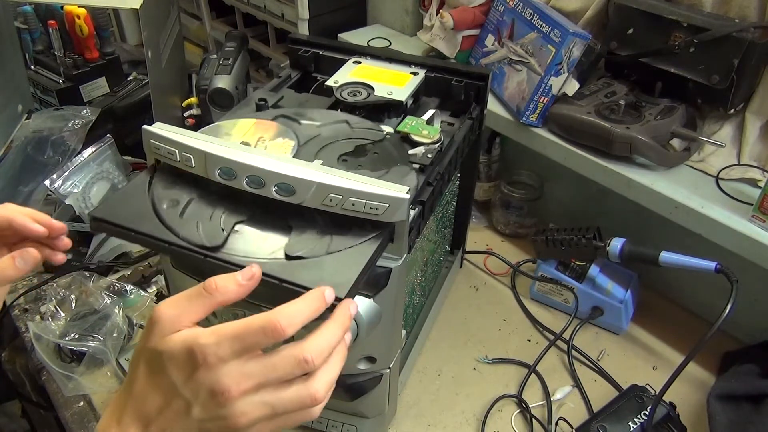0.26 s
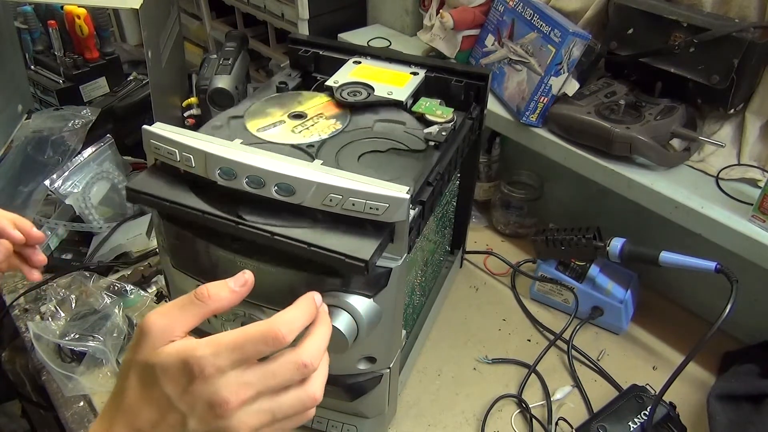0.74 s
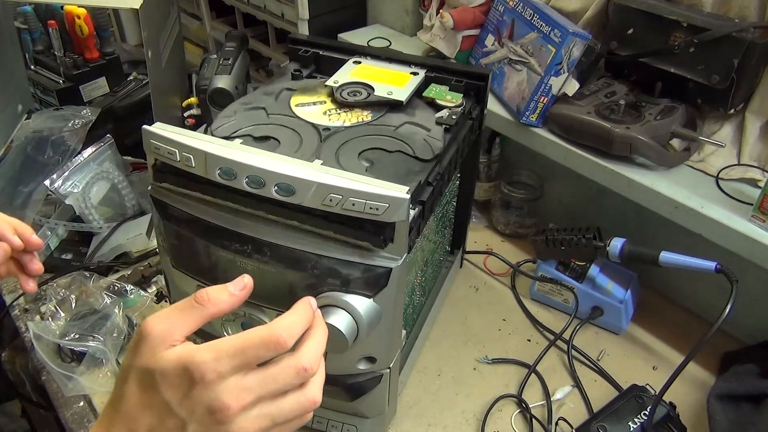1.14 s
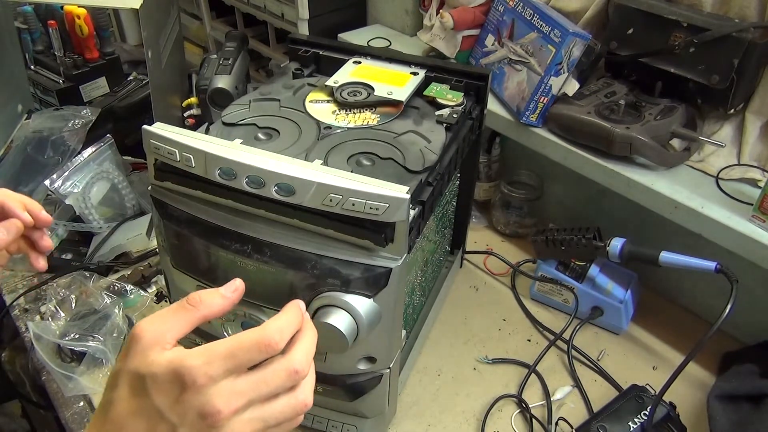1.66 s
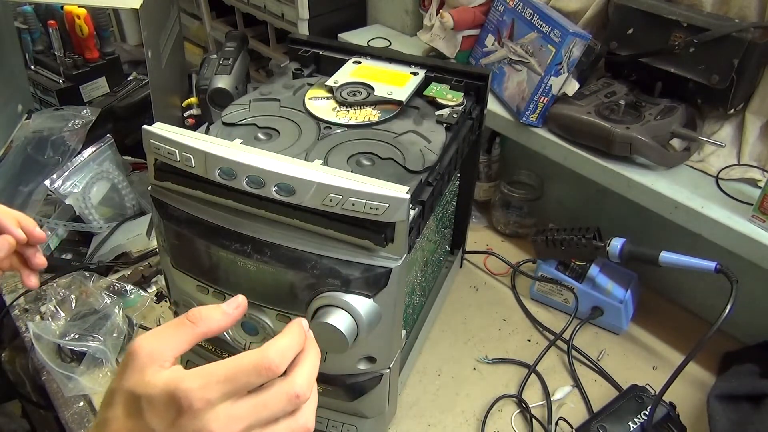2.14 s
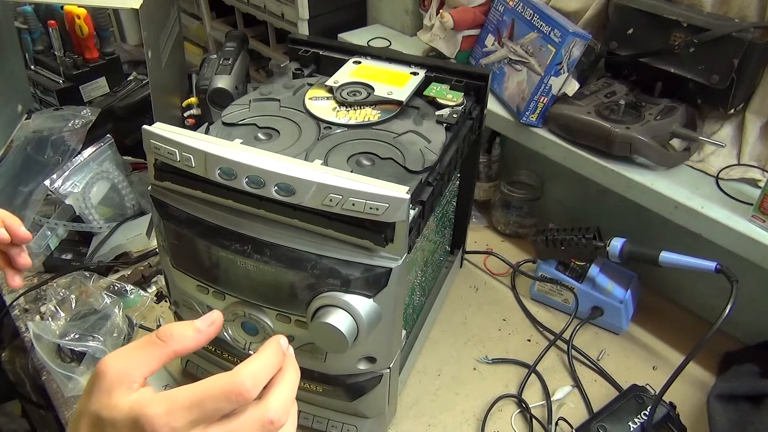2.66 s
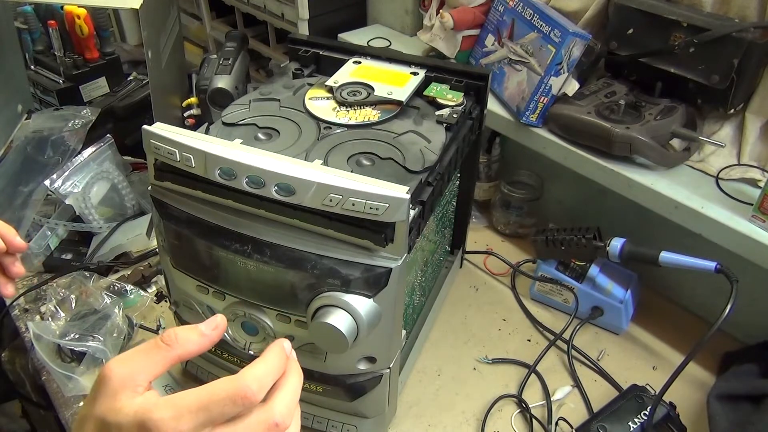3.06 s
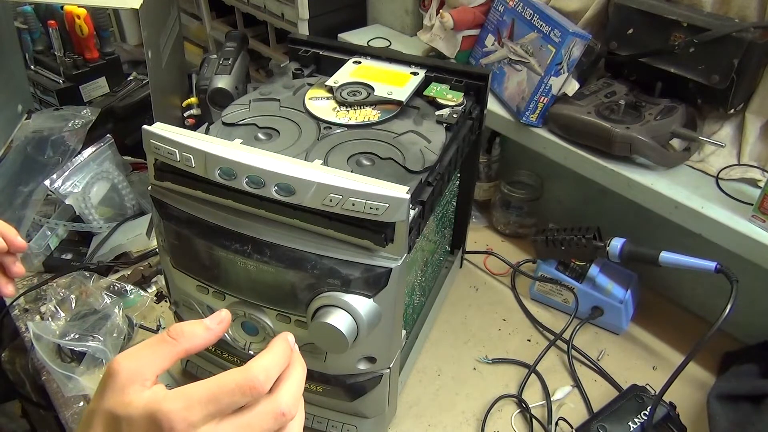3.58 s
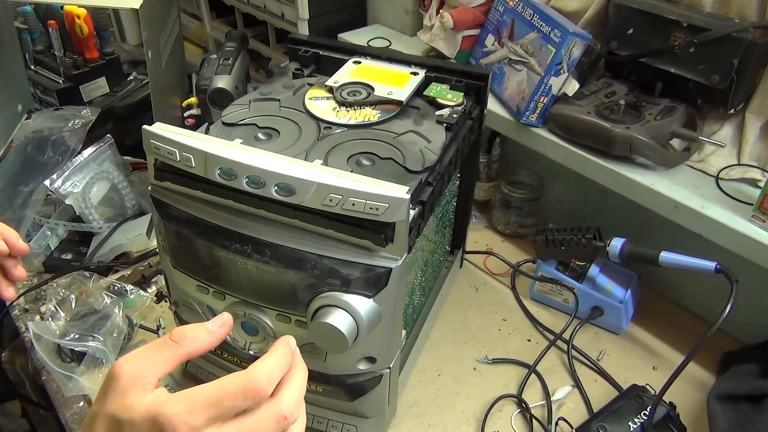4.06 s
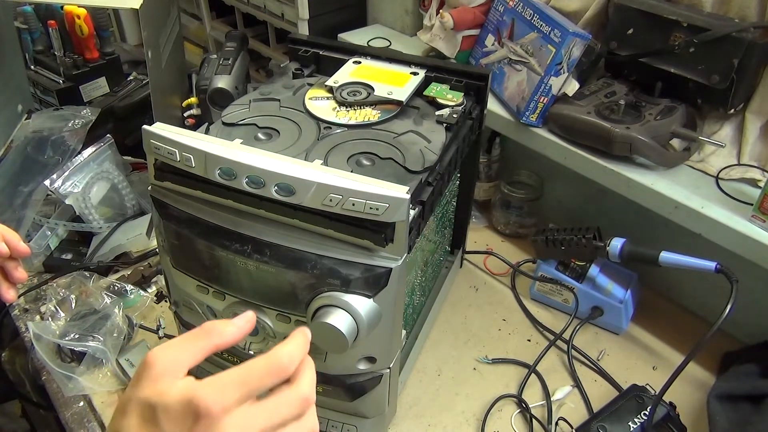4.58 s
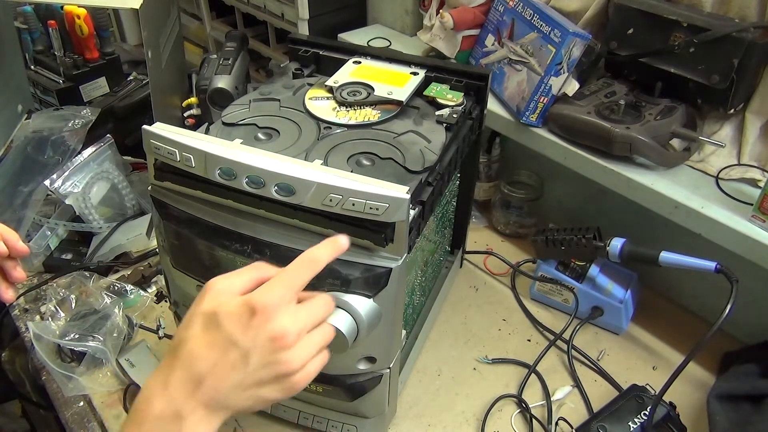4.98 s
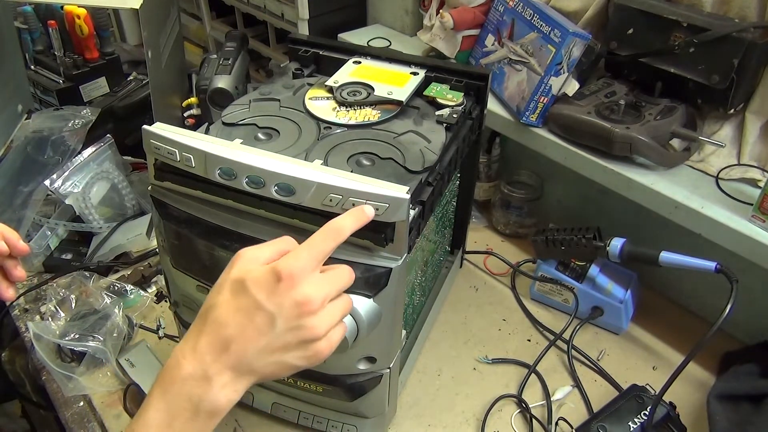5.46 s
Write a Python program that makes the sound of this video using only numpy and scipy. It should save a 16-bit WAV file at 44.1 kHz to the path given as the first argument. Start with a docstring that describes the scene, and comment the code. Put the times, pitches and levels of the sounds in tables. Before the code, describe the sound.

A plastic disc tray clatters and scrapes into its machine with motor whirr and heavy knocks, then only slowly swelling mains hum remains.

```python
"""A disc changer on a workbench draws in its plastic tray, over mains hum (stronger on the right) and room noise.
First latches click and knock; from 0.2 s a small motor whirs while the tray scrapes along its rails, and from
1.1 s a low drone joins. From 2.1 s the motor runs again, shorter, among the heaviest knocks; by 2.9 s it is still.
Near the end comes a soft rustle, then a thin fizz with ticks. Shaped noise makes scrape, clicks and rustle, wavering
sines the motor, ringing resonances the knocks. Hum and noise dip at 0.2 s and 2.05 s and creep back up."""
import sys
import numpy as np
from scipy import signal
from scipy.fft import rfft, irfft, next_fast_len
from scipy.io import wavfile
from scipy.ndimage import uniform_filter1d, map_coordinates

SR = 44100
rng = np.random.default_rng(int(sys.argv[2]) if len(sys.argv) > 2 else 0)


def generate_wav(signal):
    """Clip the signal to [-1, 1] and save it as 16-bit WAV at the path in sys.argv[1]."""
    frames = np.transpose(np.atleast_2d(signal))
    scaled = np.clip(frames, -1, 1) * 32767
    pcm = np.round(scaled).astype(np.int16)
    wavfile.write(sys.argv[1], SR, pcm)


N = 252693
T = np.arange(N) / SR  # time of each sample, s


def amp(db):
    """Gain of a level in dB."""
    return 10 ** (np.asarray(db) / 20)


def unit(x):
    """Bring a sound to rms 1 over both sides together."""
    return x / np.sqrt(np.mean(x ** 2) + 1e-20)


def along(points, hz):
    """Read a (Hz, value) curve on a log frequency axis."""
    f, v = np.transpose(points)
    return np.interp(np.log(hz + 1), np.log(f + 1), v)


def curves(rows):
    """Draw straight lines through rows: one value per sample for each column after the time."""
    s, *cols = np.transpose(rows)
    return [np.interp(T, s, c) for c in cols]


def wobble(rate):
    """A smooth random curve, rate knots a second."""
    knots = rng.standard_normal(int(N * rate / SR) + 4)
    return map_coordinates(knots, [T * rate])


def gate(start_s, end_s, fade_s):
    """One between two moments, with straight fades."""
    return np.clip(np.minimum(T - start_s, end_s - T) / fade_s, 0, 1)


def filtered(x, response):
    """Multiply the spectrum of x by a response over frequency."""
    m = next_fast_len(N + SR // 2)
    return irfft(rfft(x, m) * response(np.fft.rfftfreq(m, 1 / SR)), m)[..., :N]


def rush(spectrum, alike, spiky_db=0):
    """Coloured stereo noise; spiky noise is a hail of small uneven contacts."""
    # the factor 8 undoes the smoothing loss, so spiky_db is the usual swing
    size = amp(spiky_db * uniform_filter1d(rng.standard_normal(N), size=64) * 8)

    def mid_side(hz):
        # this split of middle and side gives the wanted left-right correlation
        turn = np.arccos(np.clip(along(alike, hz), -1, 1)) / 2
        return amp(along(spectrum, hz)) * [np.cos(turn), np.sin(turn)]

    mid, side = filtered(size * rng.standard_normal((2, N)), mid_side)
    return np.array([mid + side, mid - side])


# Resonances of tray and chassis. Each row: centre in Hz, width in Hz, strength in dB (knocks use the centre only).
BODY = [(399, 28, 7), (513.5, 95, 8), (670, 87, -1), (736.4, 49, 6), (933, 57, 6), (1062, 140, 3),
        (1300, 130, -1.5), (1670, 140, -9), (1883, 62, 2.5), (2079, 34, 1.5), (2290, 180, -5.5),
        (2610, 120, -12), (3036, 35, -30), (3590, 71, 3.5), (4420, 640, 2), (5910, 140, -17),
        (6450, 1340, 2)]


def body(f, broad):
    """Causal response of the body: its resonances over a flat share."""
    return broad + sum(amp(db) * 1j * f * w / (c * c - f * f + 1j * f * w) for c, w, db in BODY)


# The mechanism at work, before layer trims. Each row: time in seconds, low rumble, scrape and hiss in dB.
DRIVE = [(.07, -48, -56, -62), (.13, -32.5, -50, -62), (.195, -27.5, -26, -30), (.225, -30, -28, -31.5),
         (.29, -35.5, -36.5, -37.5), (.56, -32.5, -38, -40), (.76, -30.5, -33, -39), (.9, -34, -36.5, -38),
         (1.09, -32, -32.5, -37.5), (1.3, -30, -33.5, -36), (1.38, -34, -35.5, -36.5),
         (1.7, -30.5, -33, -37.5), (1.77, -40, -44.5, -48), (1.92, -47.5, -48.5, -46.5),
         (2.07, -29.5, -38, -44), (2.13, -37, -47, -46.5), (2.38, -45.5, -48, -51.5),
         (2.53, -33.5, -44, -45), (2.66, -38.5, -40.5, -51), (2.755, -47, -46.5, -53),
         (2.825, -63, -67, -68), (2.9, -63, -67, -70)]
# Colours sent into the body. Each row: frequency in Hz, relative level in dB.
RUMBLE = [(170, -36), (215, 4), (240, 5.5), (300, -3.5), (480, -7.5), (800, -9), (1300, -9.5), (1800, -54)]
SCRAPE = [(1100, -9), (1500, 1.5), (2000, -1.5), (3200, -7), (4000, -27)]
HISS = [(2600, 2), (3500, -0.5), (5500, -3.5), (7800, -4.5), (9000, -18), (16000, -36)]
# Stereo likeness of the mechanism's noise. Each row: frequency in Hz, left-right correlation.
DRIVE_ALIKE = [(60, 0.64), (130, 0.56), (290, 1), (640, 0.93), (1410, 0.74), (3100, 0.24), (6820, 0.46),
               (15000, 0.05)]
# Bench thrum: level, depth of its random surges, their knots a second; it eases once the tray is in
BENCH_DB, BENCH_SURGE_DB, BENCH_SURGES = -38, 2.5, 12.46
TRAY_HOME_S, BENCH_DROP_DB = 2.5, 8


def drive():
    """Rails and gears shake the body and the bench: noise and tooth taps through the resonances, and a low thrum."""
    rumble_db, scrape_db, hiss_db = curves(DRIVE)

    def shaken(spectrum, broad, spiky_db):
        noise = rush(spectrum, DRIVE_ALIKE, spiky_db)
        return unit(filtered(noise, lambda f: body(f, broad)))

    judder = .55 * wobble(45)  # uneven drag of the tray
    sound = amp(rumble_db + 1.5 + 1.9 * wobble(14) + 2.1 * judder) * shaken(RUMBLE, broad=1.0, spiky_db=0.5)
    sound += amp(scrape_db + 3.0 + 2.6 * judder) * shaken(SCRAPE, broad=1.6, spiky_db=0.8)
    sound += amp(hiss_db + 3.5 + 2.7 * judder) * shaken(HISS, broad=20.0, spiky_db=1.0)

    # gear teeth tap the body, about 220 times a second at random
    tap_size = amp(np.minimum(4 * rng.exponential(size=N), 12)) * rng.standard_normal(N)
    teeth = (rng.random(N) < 220 / SR) * tap_size
    teeth_colour = [(300, -38), (900, 6.5), (2300, -1.5), (4000, -23.5)]
    tapped = filtered(teeth, lambda f: body(f, broad=.05) * amp(along(teeth_colour, f)))
    sound += amp(scrape_db - 4.0) * unit(tapped)

    bench_db = BENCH_DB + BENCH_SURGE_DB * wobble(BENCH_SURGES) - BENCH_DROP_DB * (T > TRAY_HOME_S)
    bench_colour = [(50, -38), (64, 18), (78, 6), (95, -2.5), (125, -37.5)]
    sound += amp(bench_db) * unit(rush(bench_colour, DRIVE_ALIKE))
    fade_out = np.clip((2.9 - T) * 20, 0, 1)
    fade_in = np.clip((T - .07) * 50, 0, 1)
    return sound * fade_out * fade_in


# The motor's two runs. Each row: start in seconds, end in seconds, level of the main band in dB at start and at end,
# pitch in Hz at start and at end, random spread of the pitch in Hz.
WHINE = [(.22, 1.68, -49, -43.5, 7800, 7410, 433), (2.08, 2.73, -50, -46, 7530, 7440, 256)]
# The whine's two companion bands: pitch as a multiple of the main band's.
UPPER_BANDS = [1.24, 1.42]
WHINE_FADE_S = 0.049
DRONE_FROM_S, DRONE_TO_S, DRONE_DB, DRONE_SAG_DB_PER_S = 1.13, 2.74, -34.5, 5.5


def whine():
    """The motor sings in fuzzy treble bands that sink as it slows, and drones low through the chassis."""
    sound = 0
    for start, end, db0, db1, hz0, hz1, spread_hz in WHINE:
        hz = np.interp(T, [start, end], [hz0, hz1])
        # each side wavers on its own, fast enough to blur the tone into a band
        fuzzy_hz = hz + spread_hz * np.array([wobble(1500), wobble(1500)])
        turn = 2 * np.pi * np.cumsum(fuzzy_hz, axis=1) / SR
        bands = np.sin(turn) + amp(-10.5) * sum(np.sin(k * turn) for k in UPPER_BANDS)
        level_db = np.interp(T, [start, end], [db0, db1]) + 2.4 * wobble(39.9)
        sound += amp(level_db) * gate(start, end, WHINE_FADE_S) * bands
    drone_db = DRONE_DB - DRONE_SAG_DB_PER_S * (T - DRONE_FROM_S) + 3.5 * wobble(24.46) + 1.8 * wobble(5.96)
    drone = amp(drone_db) * np.sin(2 * np.pi * np.cumsum(735 + 25 * wobble(70)) / SR)
    return sound + drone * gate(DRONE_FROM_S, DRONE_TO_S, WHINE_FADE_S)


# Contacts, before band trims and body. Each row: start in seconds, level in dB, bass tilt in dB, treble tilt in dB,
# nominal time in seconds to fall 60 dB (scaled per band).
CLICKS = [(.084, -26, 0, 0.5, 0.097), (.137, -29.5, 8, -14, .077), (.152, -12.5, -2, -17, 0.06),
          (.161, -26.5, 7, -7, 0.24), (.198, -17, 10, -8, 0.048), (.211, -10.5, -7, -10, 0.04),
          (.244, -36, 7, -14, .077), (.716, -24, 4.5, -4, 0.2), (0.753, -13.5, -6, -22, 0.045),
          (.782, -11.5, -10, -32, 0.054), (.81, -15, -2.5, -29, 0.054), (0.836, -21, -6, -20, .053),
          (1.005, -25, 5, -27, .088), (1.105, -40, 6, -2, .049), (1.482, -18.5, 9, -1.5, 0.082),
          (1.51, -25, 13, -25, 0.1), (1.954, -22, 10, 3.5, 0.1), (1.984, -26, 2, -22, 0.164),
          (2.009, -13.5, -5, -6.5, 0.0595), (2.044, -10.5, -4.5, -26, 0.13), (2.073, -9.5, 0, -6.5, 0.056),
          (2.09, -23.5, 3.5, -16, 0.14), (2.139, -21, -8, -15, 0.067), (2.243, -29, -12, -4.5, 0.19),
          (2.292, -24.5, 6.5, -38, 0.077), (2.42, -40, 17.5, -23, 0.081), (2.449, -26.5, -3, -28, 0.18),
          (2.464, -31.5, 18, -8, 0.11), (2.542, -18.5, -16, -14, 0.12), (2.561, -24, -3, -14, .084),
          (2.646, -25, -1, -20, 0.1), (2.666, -21.5, 2.5, -41, .067), (2.678, -32.5, 18, -15.5, .058),
          (2.723, -25.5, -1, -18, 0.07), (2.77, -23.5, -10, -14.5, .082), (2.986, -56, 23.5, -9.5, 0.086),
          (3.089, -63, 11, -1, .07)]
# Bands of a click, low to high. Each row: lower edge in Hz, upper edge in Hz.
BANDS_HZ = [(300, 850), (850, 1500), (1500, 3300), (3300, 5500), (5500, 9200), (9200, 14000)]
# How much of a click's bass and treble tilt each band takes: one factor per band, low to high.
BASS_SHARE = [1.13, 0.75, 0.22, 0.06, 0.1, 0]
TREBLE_SHARE = [0.012, 0.065, 0, 0.34, 1.22, 4.5]
CLICK_LEAN_DB = 6.5  # left over right, before the band's own factor


def clicks():
    """Each contact chatters briefly into the body: six bands of dying noise, with its own colour."""
    t = np.arange(SR // 4) / SR
    shakes = np.zeros((len(BANDS_HZ), 2, N + SR))
    # factors per band, low to high: decay speed, difference between the sides, lean to the left
    faster = np.array([.8, .9, 1.01, 1.2, 1.5, 1.8])[:, None]
    apart = np.array([0.114, 0.25, 0.79, 1.77, 0.99, 1.0])[:, None, None]
    leaning = np.array([0.3, 0.53, 1.1, 1.4, 0.53, .15])[:, None, None]
    for s, db, bass_db, treble_db, t60 in CLICKS:
        bands_db = bass_db * np.array(BASS_SHARE) + treble_db * np.array(TREBLE_SHARE)
        shared, own = rng.standard_normal(len(t)), rng.standard_normal((2, len(t)))
        chatter = (shared + apart * own) * amp(leaning * [[CLICK_LEAN_DB / 2], [-CLICK_LEAN_DB / 2]])
        shape = amp(db + bands_db[:, None] - 60 * faster * t / t60) * (1 - np.exp(-t / 0.00067))
        shape *= 1 + 0.64 * np.exp(-t / 0.0013)  # the first snap stands out
        first = round(s * SR)
        shakes[..., first:first + len(t)] += shape[:, None] * chatter
    sound = 0
    for shake, edges, db in zip(shakes, BANDS_HZ, (-3.0, 4.0, 5.0, -3.0, -2.0, -13.5)):
        band = signal.butter(3, edges, "bandpass", fs=SR, output="sos")
        sound += amp(db) * signal.sosfilt(band, shake[:, :N])
    return filtered(sound, lambda f: body(f, broad=0.87))


# Blunt knocks. Each row: start in seconds, level in dB before trim and attack, pitch of the struck part in Hz,
# time in seconds to fall 60 dB.
KNOCKS = [(.153, -11, 2360, 0.024), (.165, -19.5, 400, 0.26), (.197, -18.5, 459, 0.25),
          (.199, -23, 4500, .036), (.212, -18, 5730, 0.033), (.716, -18.5, 6040, 0.041),
          (.756, -19, 2300, .032), (.762, -15, 1055, .045), (.783, -15.5, 2530, .035),
          (.786, -9, 1080, 0.044), (.811, -11, 1110, 0.069), (.838, -16, 1070, 0.078),
          (1.147, -18, 1890, 0.097), (1.169, -17.5, 2000, .16), (1.242, -13.5, 1015, 0.049),
          (1.244, -18.5, 2030, .08), (1.328, -17, 1930, 0.14), (1.48, -19, 753, 0.29),
          (1.48, -22, 1310, 0.074), (1.506, -20, 940, 0.19), (1.956, -15.5, 2260, 0.08),
          (1.956, -28, 6260, .05), (1.975, -25, 1310, 0.2), (2.005, -14, 720, 0.093),
          (2.011, -21.5, 2660, 0.049), (2.046, -3, 2770, 0.024), (2.057, -21, 1687, 0.27),
          (2.073, -14, 1310, 0.067), (2.073, -32, 5900, .035), (2.074, -21, 2870, .1),
          (2.294, -17, 736, 0.046), (2.451, -23, 1850, .08), (2.462, 2, 650, 0.023),
          (2.462, -29, 520, 0.049), (2.465, -29.5, 2970, 0.099), (2.484, -4.5, 685, 0.039),
          (2.544, 1.5, 636, 0.043), (2.544, -21.5, 3520, 0.038), (2.545, -27, 520, .09),
          (2.546, -17, 400, 0.067), (2.56, -16.5, 1860, 0.08), (2.565, -17, 710, .16),
          (2.646, -28, 2350, .05), (2.678, -21, 1310, .06), (3.004, -44, 1660, .06)]
# Place of the knocks. Each row: pitch in Hz, left over right in dB.
KNOCK_LEAN = [(450, 2), (700, 3), (1200, 5), (1900, 6.5), (2800, 17), (6000, 7)]
RISE_CYCLES, RISE_MIN_S = 1.06, 0.00031  # a knock swells over a few of its own cycles


def knocks():
    """A blunt blow rings only the resonances near the pitch of the struck part."""
    t = np.arange(SR // 4) / SR
    hz = np.array(BODY)[:, :1]
    out = np.zeros((2, N + SR))
    for s, db, part_hz, t60 in KNOCKS:
        rise = RISE_MIN_S + RISE_CYCLES / part_hz
        pan_db = along(KNOCK_LEAN, part_hz)
        share = np.exp(-.5 * (np.log(hz / part_hz) / .065) ** 2)
        # loose parts blur the ring: its phase strays at random
        stray = np.cumsum(0.032 * hz / 1000 * rng.standard_normal((len(hz), len(t))), axis=1)
        turn = 2 * np.pi * hz * t + stray
        ring = (share * np.sin(turn)).sum(0) / share.sum()
        ring = ring * (1 - np.exp(-t / rise)) ** 2 * amp(db + 2.0 - 60 * t / t60)
        first = round(s * SR)
        out[:, first:first + len(t)] += ring * amp([[pan_db / 2], [-pan_db / 2]])
    return out[:, :N]


# The workshop's reverberation. Each row: frequency in Hz, time in seconds to fall 60 dB.
SHOP = [(300, 0.045), (2000, 0.27), (10000, 0.27)]


def shop(x):
    """Each frequency of the workshop's answer, a tail of dying noise, fades at its own speed."""
    hz, t, z = signal.stft(rng.standard_normal((2, SR // 2)), SR, nperseg=256)
    dying = z * amp(-60 * t / along(SHOP, hz)[:, None])
    tail = signal.istft(dying, SR, nperseg=256)[1]
    late = np.pad(x, (300, 0))[None]  # delay in samples
    return signal.fftconvolve(late, tail / np.linalg.norm(tail[0]), axes=1)[:, :N]


# Soft brushes. Each row: middle in seconds, level in dB, bell width (standard deviation) in seconds.
RUSTLE = [(5.06, -51.5, .025), (5.185, -56, 0.028), (5.6, -56, 0.2)]


def rustle():
    """A hand brushes past, softly: swells of spiky treble noise."""
    level = sum(amp(db) * np.exp(-.5 * ((T - s) / width) ** 2) for s, db, width in RUSTLE)
    colour = [(1200, -30), (2200, -3), (3200, -7), (4500, -11), (7000, -25)]
    return level * unit(rush(colour, [(3000, .4)], spiky_db=1.0))


# Ticks in the fizz. Each row: start in seconds, level in dB before trim.
TICKS = [(5.351, -36), (5.474, -33), (5.5465, -31.5)]
FIZZ_FROM_S, FIZZ_DB, FIZZ_GROWS_DB_PER_S = 5.34, -60, 5


def fizz():
    """A narrow, growing band of treble noise with a few quickly dying ticks in it."""
    level = amp(FIZZ_DB + FIZZ_GROWS_DB_PER_S * (T - FIZZ_FROM_S) + 2.6 * wobble(50)) * (T > FIZZ_FROM_S)
    for s, db in TICKS:
        level += amp(db - 9.0 - 60 * np.abs(T - s) / 0.019) * (T > s)
    colour = [(6000, -40), (6600, -8), (6900, 0), (7200, -8), (7900, -40)]
    return level * unit(rush(colour, [(7000, .5)], spiky_db=2.5))


# Odd multiples of the mains, before the side levels. Each row: multiple, relative level in dB.
HUM = [(1, 0), (3, -6.7), (5, -14.7), (7, -36), (9, -29), (11, -30), (13, -41), (15, -38), (17, -38),
       (19, -41), (21, -43), (23, -44), (25, -50), (27, -48), (29, -47)]
# Steady tones alike on both sides. Each row: frequency in Hz, level in dB against the fundamental before side levels.
BUZZ = [(100, -65.5), (120, -38), (200, -35.5), (400, -39), (500, -49.5)]
MAINS_HZ = 50.012


def hum():
    """Mains in the microphone leads: odd multiples, the high ones lined up into a sharp corner twice a cycle."""
    turn = 2 * np.pi * MAINS_HZ * T + 3
    turn += 0.018 * wobble(1.88) + 0.0017 * wobble(34)  # the grid drifts a little
    last, last_db = HUM[-1]
    # above the table the multiples fall by 11 dB an octave
    high = [(k, last_db + 0.5 - 11 * np.log2(k / last)) for k in range(31, 141, 2)]

    def lead(k):
        # phase within the cycle; the lowest multiples run ahead of the corner
        return 3.72 * np.exp(-(k - 1) ** 2 / 3.3) - 2.75 - .967 * k

    wave = sum(amp(db) * np.cos(k * turn + lead(k)) for k, db in [*HUM, *high])
    buzz = sum(amp(db + 2.1 * wobble(4.22)) * np.sin(2 * np.pi * hz * T) for hz, db in BUZZ)
    return np.sqrt(2) * (wave * amp([[-5], [3.2]]) + buzz)  # side levels: left, right


# Gain shared by hum and room noise. Each row: time in seconds, gain in dB.
CREEP = [(0, -17), (.2, -17), (.235, -26), (.35, -23.5), (.78, -22), (1.4, -19), (2.04, -18.5),
         (2.055, -30), (2.11, -23.5), (2.54, -22.5), (2.56, -23.5), (3.5, -20.5), (4.5, -19), (5.73, -16)]
# Colour of room and preamplifier noise. Each row: frequency in Hz, relative level in dB.
ROOM = [(15, -6.5), (40, -8), (72, -8.5), (100, -9.5), (300, -15.5), (1000, -28), (3000, -35.5),
        (8000, -41), (16000, -46)]
# Stereo likeness of that noise. Each row: frequency in Hz, left-right correlation.
ROOM_ALIKE = [(60, 0.25), (300, 0.56), (1400, 0.25), (4000, 0), (15000, 0.043)]


def background():
    """Hum and coloured noise rise and sink together along one drawn curve."""
    level_db, = curves(CREEP)
    room = amp(-21.5 + 0.7 * wobble(6)) * unit(rush(ROOM, ROOM_ALIKE))
    return amp(level_db) * (hum() + room)


# Place of mechanism and motor. Each row: frequency in Hz, left over right in dB.
DRIVE_LEAN = [(230, 5), (700, 2), (1300, 4), (2400, 6), (4400, 10.5), (8100, 0), (15000, 2)]


def scene():
    """Mix all layers; the machine stands to the left, and its hits stir the workshop."""
    hits = clicks() + knocks()

    def lean(hz):
        return amp(along(DRIVE_LEAN, hz) * [[.5], [-.5]])

    machine = filtered(drive() + whine(), lean)
    echo = amp(-11) * shop(hits.mean(0))
    return machine + hits + echo + fizz() + rustle() + background()


TOP_HZ = 15900  # band limit


def record(dry):
    """Peaks flatten towards full scale; then everything above the band limit is cut."""
    flattened = dry / (1 + np.abs(dry) ** 6) ** (1 / 6)
    return filtered(flattened, lambda hz: hz < TOP_HZ)


dry = scene()
out = record(dry)
generate_wav(out)
```